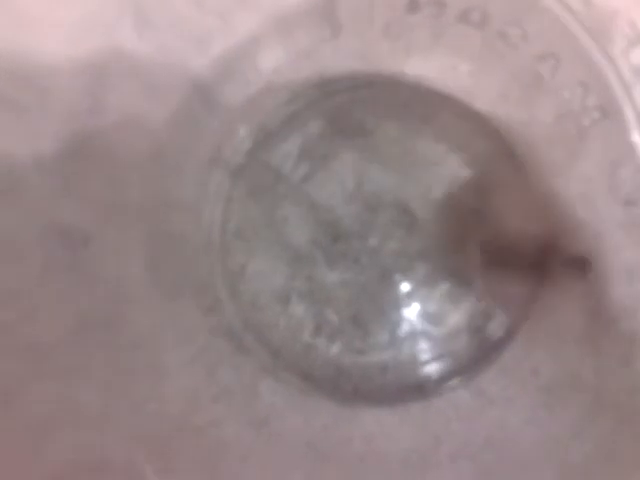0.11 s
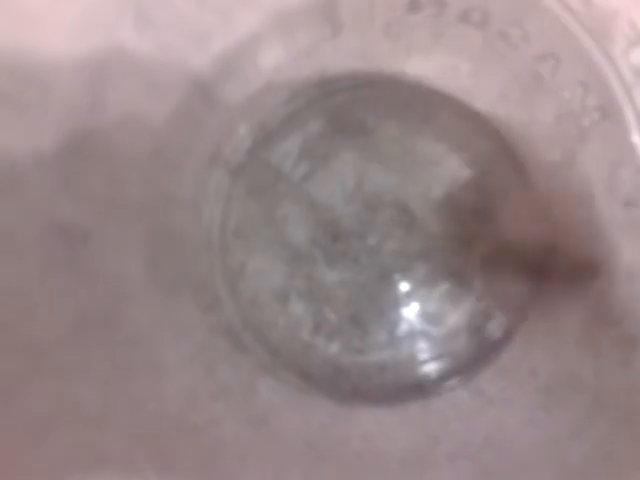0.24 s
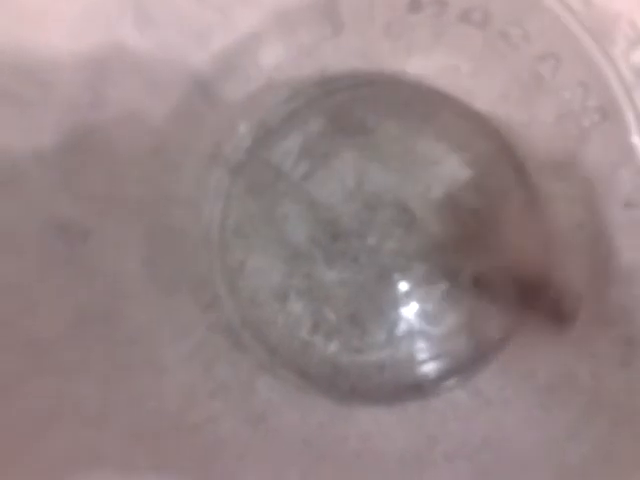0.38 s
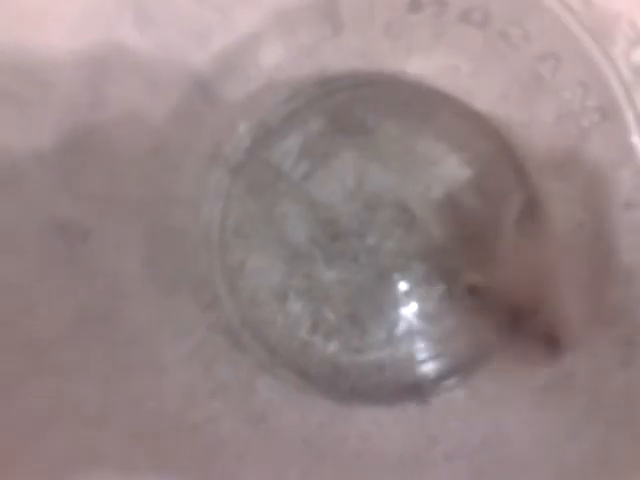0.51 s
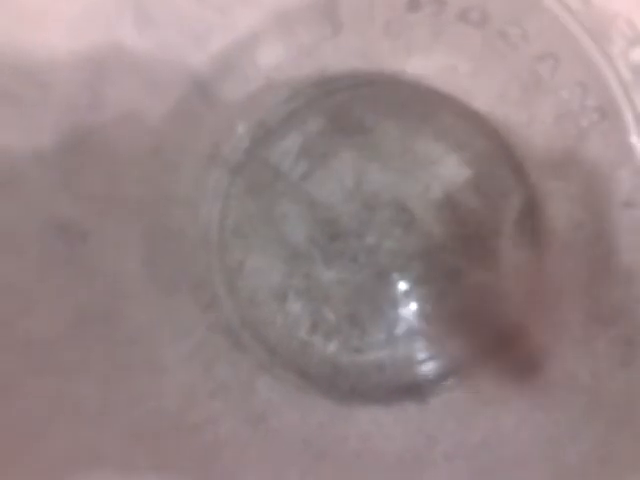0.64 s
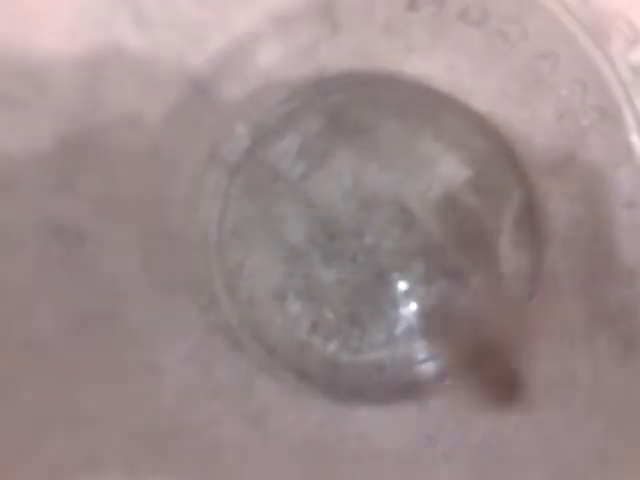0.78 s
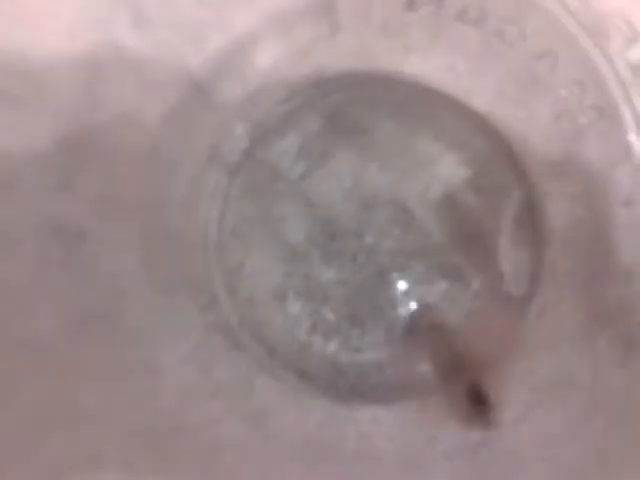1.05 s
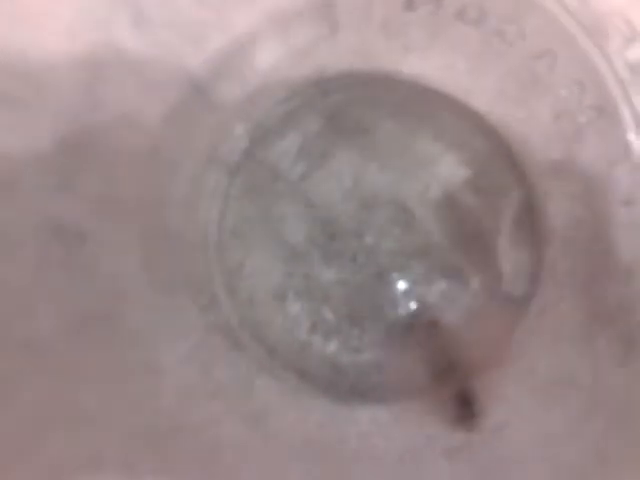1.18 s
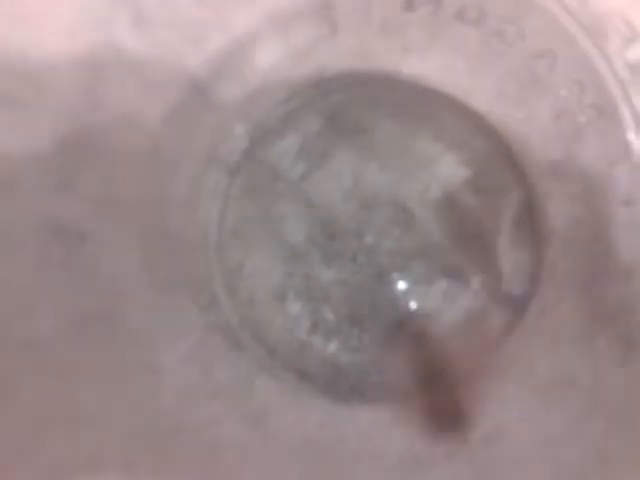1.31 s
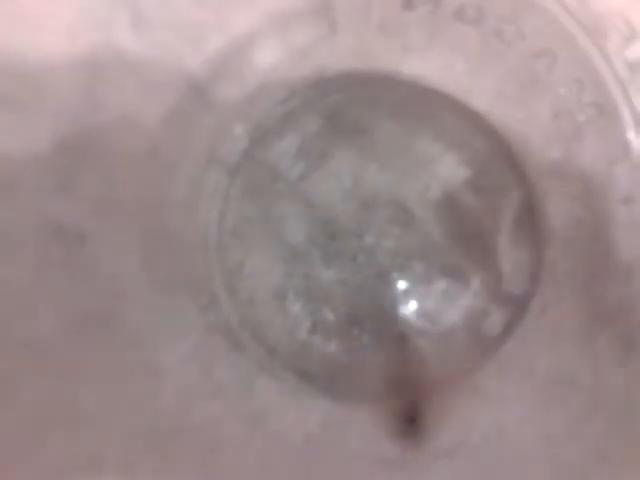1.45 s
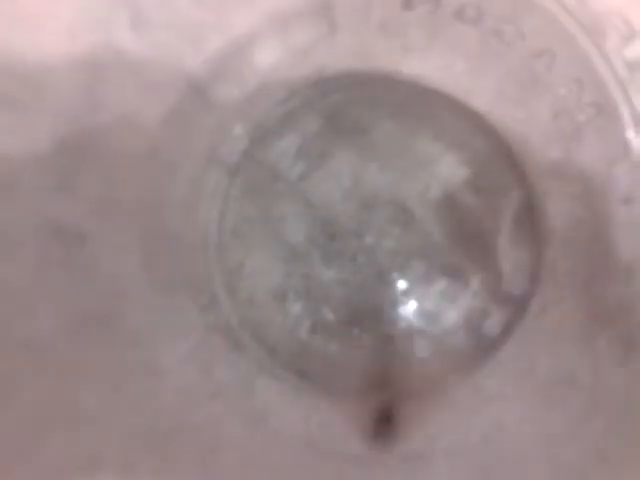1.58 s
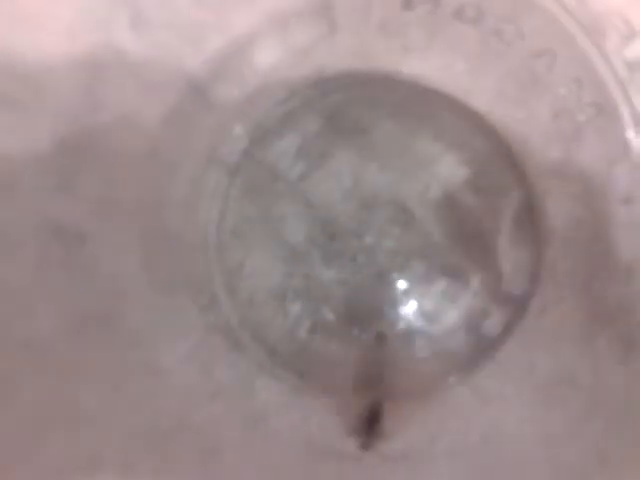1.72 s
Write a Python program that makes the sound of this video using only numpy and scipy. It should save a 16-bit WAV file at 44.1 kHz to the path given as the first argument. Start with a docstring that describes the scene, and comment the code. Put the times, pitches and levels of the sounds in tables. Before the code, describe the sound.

Faint insect wings whir and tick against a glass jar, with some soft thuds early.

```python
"""Throughout: quiet room rumble, hiss and two faint steady tones, a low hum and a thin high ring.
From the start a moth whirs inside a glass jar:
about 58 times a second its wings pat and tick against the wall, which rings briefly.
From 0.15 to 0.55 s a few dull bumps shake the jar and the surface under it.
The wings beat on, now harder, now softer, to the end at 1.8 s."""
import sys
import numpy as np
from scipy import signal
from scipy.fft import rfft, irfft, next_fast_len
from scipy.io import wavfile

SR = 44100
rng = np.random.default_rng(int(sys.argv[2]) if len(sys.argv) > 2 else 0)


def digitize_waveform(pressure):
    """Quantize a signal to 16-bit integers and store it at the path in sys.argv[1].

    Rows of a 2-D input are taken as channels; values are limited to [-1, 1].
    """
    field = np.atleast_2d(pressure).T
    bounded = np.clip(field, -1, 1)
    quanta = np.round(bounded * 32767).astype(np.int16)
    wavfile.write(sys.argv[1], SR, quanta)


N = 79380

# room rumble spectrum: f/Hz, relative density/dB
RUMBLE_SPECTRUM = [(25, -4), (45, 6.5), (75, 0), (110, -5), (145, -6.5), (190, -8), (350, -9.5),
                   (430, -13.5), (540, -7.5), (760, -16), (1000, -14), (1600, -20), (2300, -43)]
# microphone hiss spectrum: f/Hz, relative density/dB
HISS_SPECTRUM = [(800, -25), (1600, -1), (3000, -1.5), (5000, -3), (9000, -7), (12000, -6.5), (15700, -8)]
# faint steady tones, a low hum and a thin high ring at the jar's pitch: f/Hz, level/dB
STEADY_TONES = [(119.5, -69.5), (3548, -72)]
# modes of the surface under the jar: f/Hz, gain/dB, t60/s
SURFACE_MODES = [(95.9, -8, 0.12), (145, -7, 0.05), (186.2, -.5, 0.06), (247.5, -5.5, .055),
                 (307, -12.5, .06), (497, -16, 0.04), (595, -10, 0.024), (970, -3.5, 0.011),
                 (1340, -12, 0.0093), (2140, -14.5, 0.011)]
# dull bumps: t/s, level/dB, contact time/s
BUMP_HITS = [(0.145, -41.5, 0.0017), (0.2349, -20, 0.00039), (.252, -28, 0.0022), (.286, -37.5, 0.0031),
             (.314, -40, 0.0019), (0.436, -30.5, 0.005), (0.461, -37.5, 0.0048), (.488, -36, .007),
             (0.541, -49.5, 0.002)]
# wingbeat rate: t/s, f/Hz
WINGBEAT_RATE = [(0, 56.79), (.18, 58.76), (.24, 55.25), (.42, 57.85), (.69, 58.93), (.75, 53.89),
                 (.83, 57.97), (.95, 58.84), (1.38, 58.08), (1.8, 59.11)]
# wing contact with the glass: t/s, soft pat level/dB, sharp wing-tip tick level/dB
CONTACT_LEVELS = [(0, -60.5, -68), (.22, -55, -60.5), (.29, -48.5, -59), (.37, -50.5, -58.5),
                  (.41, -55.5, -60.5), (.51, -52, -57.5), (.65, -61.5, -70), (.76, -55, -57.5),
                  (.85, -48.5, -50.5), (.91, -62, -65.5), (.98, -53.5, -57), (1.08, -46.5, -55),
                  (1.14, -53.5, -57), (1.22, -51.5, -55.5), (1.26, -54.5, -70), (1.3, -51.5, -51.5),
                  (1.38, -53, -53.5), (1.45, -50.5, -55.5), (1.54, -53.5, -55), (1.63, -54.5, -54.5),
                  (1.67, -52, -57), (1.8, -51, -55.5)]
# accented strokes: t/s, pat offset/dB, tick offset/dB
STROKE_ACCENTS = [(.084, 13, 6), (.136, 13.5, -2.5), (.17, 9, 2), (.276, 6.5, -0.5), (.311, 4.5, -2),
                  (.469, 11, -1), (.606, 8.5, 7.5), (.64, 4, 12), (.674, 13, 13), (.708, 6.5, 7.5),
                  (.726, 6.5, 0), (.743, 2, 9.5), (.78, 9, 2), (.798, 10, -12), (.832, 3.5, 0),
                  (.867, 3, 2), (1.056, -4, 5), (1.073, -3.5, 5), (1.09, 4, 0), (1.209, 4, 1),
                  (1.312, 8, -5), (1.347, 0.5, 2), (1.381, -2, 3), (1.536, 6, -0.5)]
# jar modes: f/Hz, gain/dB, t60/s, rise/s, pat share of the drive (0 all tick, 1 all pat)
GLASS_MODES = [(2034.6, -1.5, 0.045, 0.00062, 1), (1992, -12, 0.026, 0.0005, 1),
               (3560, -8.5, 0.066, 0.0024, 0.78), (3702, -4.5, 0.039, 0.0028, 0.06),
               (3828, 5.5, 0.04, 0.0037, .55), (3921, 1.5, .026, 0.0032, 0.74),
               (4067, 3, 0.03, 0.0034, 0.76), (5160, -6, 0.052, 0.00028, 0),
               (5695, -10.5, 0.057, 0.00042, 0.07), (6220, -5, 0.032, .0005, 0.06),
               (6640, -0.5, 0.044, .0005, 0), (6940, -2.5, .037, 0.0007, 0), (8080, -2.5, 0.032, .0004, 0),
               (8800, -10, 0.027, 0.00037, 0), (9200, -6.5, 0.025, .0004, 0.1),
               (9370, -14, 0.034, .0004, 0.1), (9900, -14, 0.038, .0004, 0.2),
               (10880, -15.5, 0.036, 0.00045, 0.1)]
# wing brushing the wall: f/Hz, relative density/dB
SCUFF_SPECTRUM = [(500, -18), (2500, 1.5), (4700, -18), (7000, 1), (9500, 3), (12000, -8.5), (15000, -2)]


def amp(db):
    """Decibels to gain."""
    return 10 ** (np.asarray(db) / 20)


def filtered(x, response):
    """x times a response of frequency."""
    m = next_fast_len(N + 8192)
    return irfft(rfft(x, m) * response(np.fft.rfftfreq(m, 1 / SR)), m)[:N]


def noise(spectrum):
    """Noise of rms 1 with the given (f/Hz, level/dB) colour."""
    f, db = np.transpose(spectrum)
    x = filtered(rng.standard_normal(N), lambda hz: amp(np.interp(np.log(hz + 1), np.log(f + 1), db)))
    return x / x.std()


def add(track, s, sound):
    """Mix a sound into the track at time s."""
    part = track[max(0, round(s * SR)):][:len(sound)]
    part += sound[:len(part)]


def background(rumble_db=-58, hiss_db=-62):
    """Low room rumble, microphone hiss and faint steady tones."""
    t = np.arange(N) / SR
    tones = sum(amp(db) * np.sin(2 * np.pi * (hz * t + rng.random())) for hz, db in STEADY_TONES)
    return amp(rumble_db) * noise(RUMBLE_SPECTRUM) + amp(hiss_db) * noise(HISS_SPECTRUM) + tones


def room(x, t60_s=0.36):
    """Short diffuse reverberation of a furnished room."""
    t = np.arange(SR // 3) / SR
    tail = rng.standard_normal(len(t)) * np.exp(-np.log(1000) * t / t60_s)
    return signal.fftconvolve(x, tail / np.linalg.norm(tail))[:N]


def bumps(rise_cycles=0.18):
    """Soft blows ring the surface; longer contact weakens the higher modes."""
    out, t = np.zeros(N), np.arange(SR // 4) / SR
    hz, db, t60_s = np.transpose(SURFACE_MODES)[:, :, None]
    swell = 1 - np.exp(-t * hz / rise_cycles)
    decay = np.exp(-np.log(1000) * t / t60_s)
    thud = (amp(db) * swell * decay * np.sin(2 * np.pi * hz * t)).sum(axis=0)
    for start_s, level_db, contact_s in BUMP_HITS:
        push = np.sin(np.pi * np.minimum(t / contact_s, 1)) ** 2
        add(out, start_s, amp(level_db) * signal.fftconvolve(thud, push / push.sum()))
    return out


def wing_strokes(first_s=0.0136, jitter_s=0.0003, pat_scatter_db=2.55, tick_scatter_db=1.67):
    """One wall contact per wingbeat, uneven in force: t/s, pat level/dB, tick level/dB."""
    t = np.arange(N) / SR
    beats = np.cumsum(np.interp(t, *np.transpose(WINGBEAT_RATE))) / SR
    times_s = first_s + np.interp(np.arange(int(beats[-1])), beats, t)
    knots_s, pat_db, tick_db = np.transpose(CONTACT_LEVELS)
    trend_db = np.array([np.interp(times_s, knots_s, pat_db), np.interp(times_s, knots_s, tick_db)]).T
    levels_db = trend_db + rng.standard_normal(trend_db.shape) * [pat_scatter_db, tick_scatter_db]
    for accent_s, *offsets_db in STROKE_ACCENTS:
        nearest = np.argmin(abs(times_s - accent_s))
        levels_db[nearest] = trend_db[nearest] + offsets_db
    return zip(times_s + jitter_s * rng.standard_normal(len(times_s)), *levels_db.T)


def wings_on_glass(mode_scatter_db=2.5, scuff_re_tick_db=-4.5, scuff_t60_s=0.029):
    """Each stroke pats the jar's low modes, ticks the high ones and scuffs the wall."""
    ring, scuff_envelope = np.zeros(N), np.zeros(N)
    t = np.arange(SR // 10) / SR
    hz, db, t60_s, rise_s, pat_share = np.transpose(GLASS_MODES)[:, :, None]
    swell = 1 - np.exp(-(t / rise_s) ** 2)
    decay = np.exp(-np.log(1000) * t / t60_s)
    modes = amp(db) * swell * decay * np.sin(2 * np.pi * hz * t)
    scuff_decay = np.exp(-np.log(1000) * t / scuff_t60_s)
    for start_s, pat_db, tick_db in wing_strokes():
        drive_db = pat_share * pat_db + (1 - pat_share) * tick_db
        drive_db += mode_scatter_db * rng.standard_normal(hz.shape)
        add(ring, start_s, (amp(drive_db) * modes).sum(axis=0))
        add(scuff_envelope, start_s, amp(tick_db + scuff_re_tick_db) * scuff_decay)
    return ring + scuff_envelope * noise(SCUFF_SPECTRUM)


def scene(flutter_send_db=-10, bump_send_db=-9):
    """The jar close to the microphone, in its room; mono."""
    flutter, thuds = wings_on_glass(), bumps()
    reverb = room(amp(flutter_send_db) * flutter + amp(bump_send_db) * thuds)
    return (flutter + thuds + reverb + background())[None]


def record(dry, low_cut_hz=59.6, top_hz=15750):
    """Recorder: bass cut and hard upper band limit."""
    low_cut = signal.butter(4, low_cut_hz, "high", fs=SR, output="sos")
    thinned = signal.sosfilt(low_cut, dry[0])
    return filtered(thinned, lambda hz: hz < top_hz)[None]


dry = scene()
out = record(dry)
digitize_waveform(out)
```